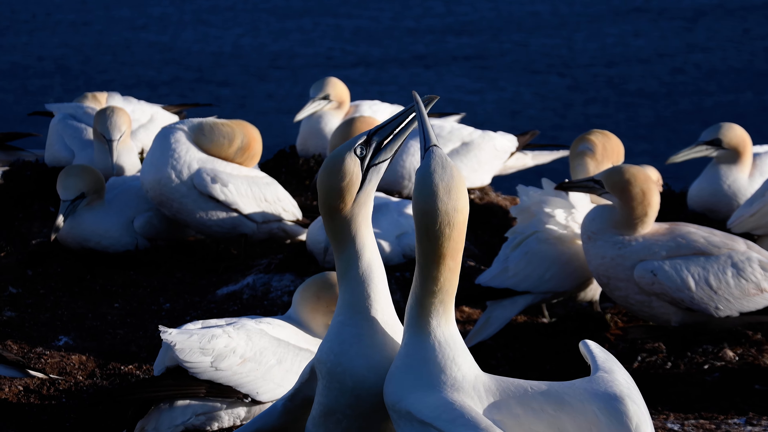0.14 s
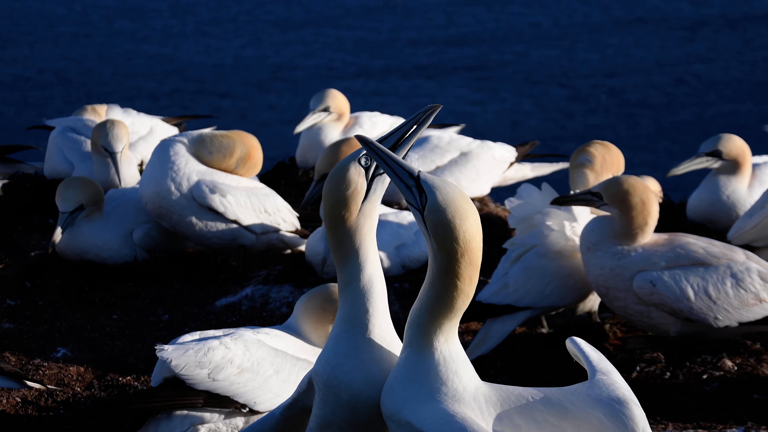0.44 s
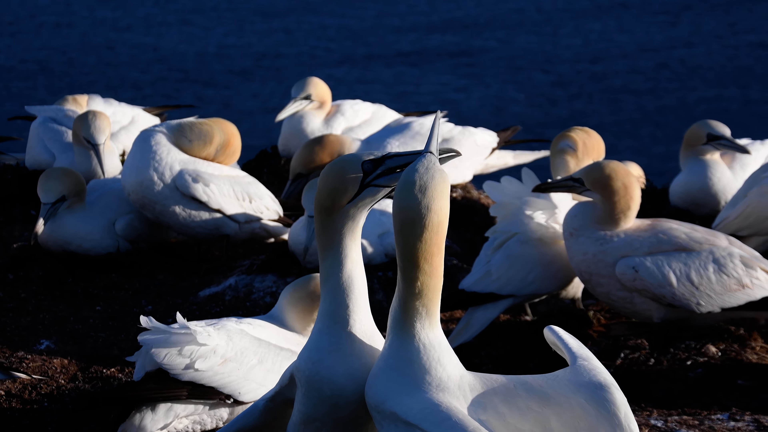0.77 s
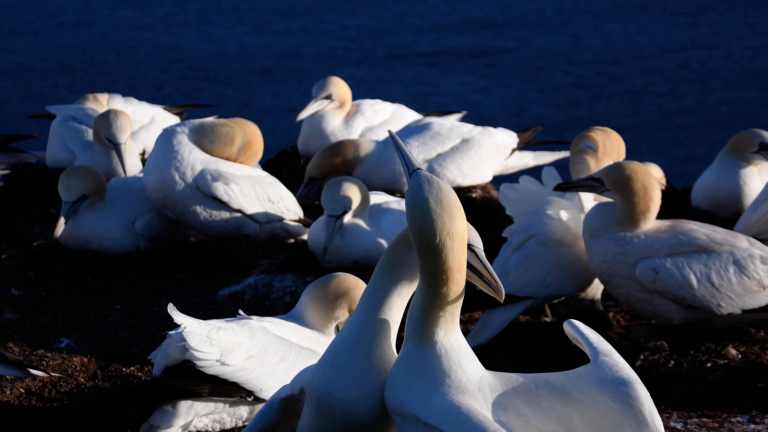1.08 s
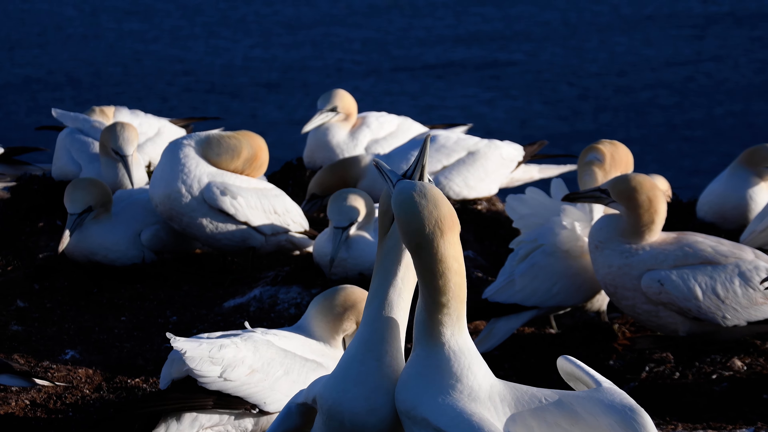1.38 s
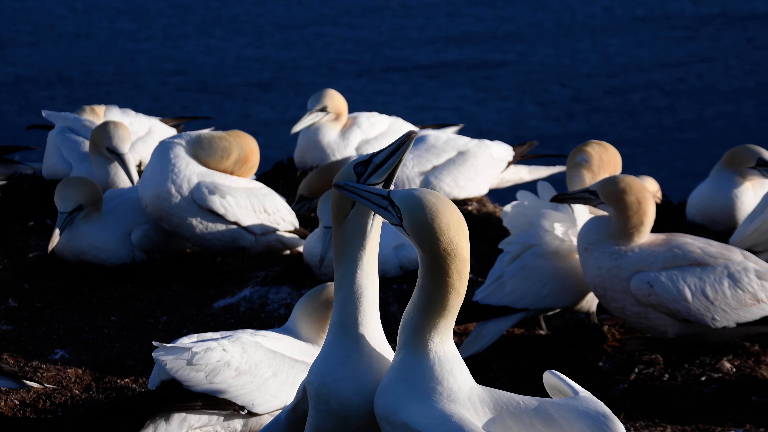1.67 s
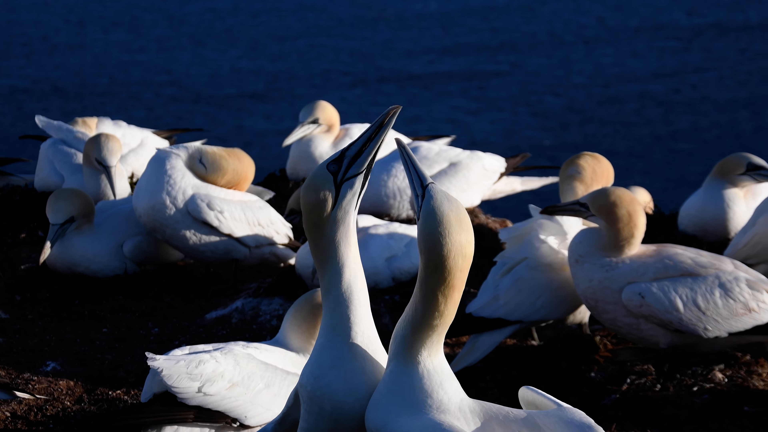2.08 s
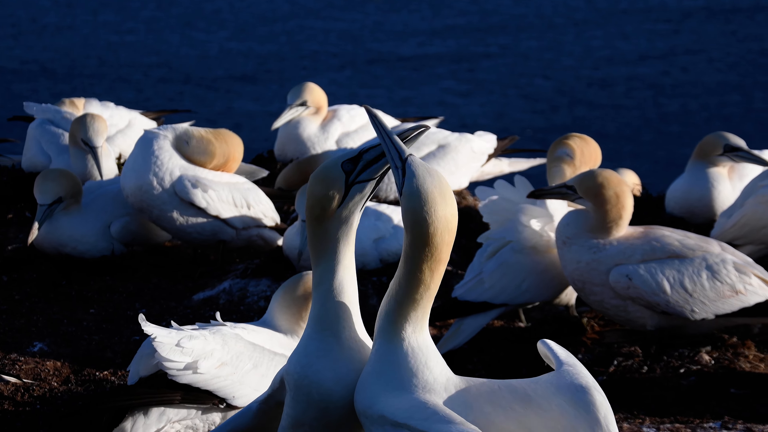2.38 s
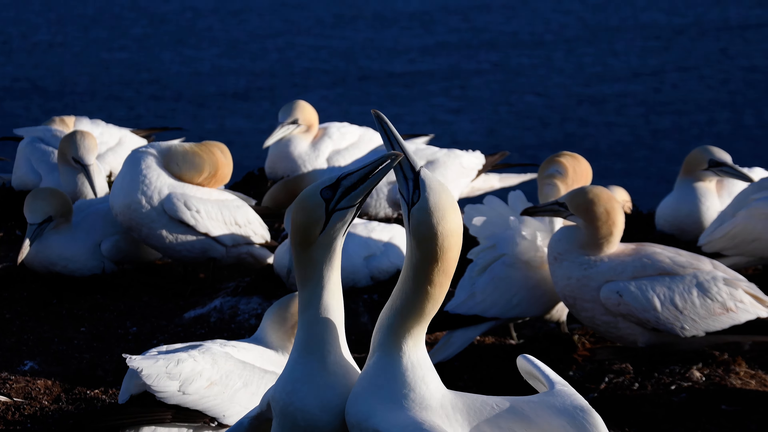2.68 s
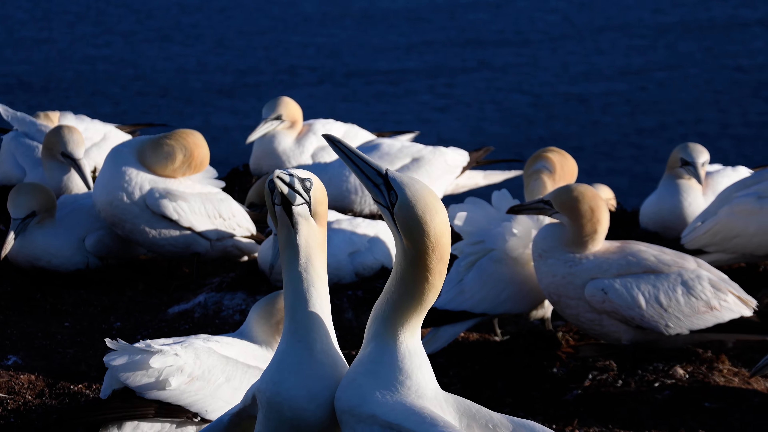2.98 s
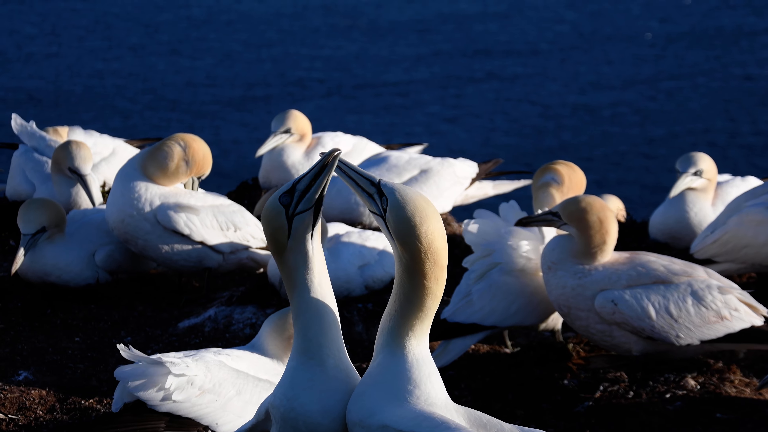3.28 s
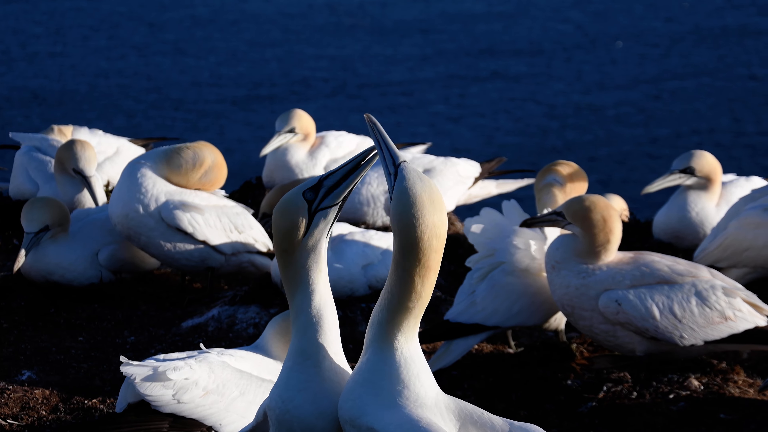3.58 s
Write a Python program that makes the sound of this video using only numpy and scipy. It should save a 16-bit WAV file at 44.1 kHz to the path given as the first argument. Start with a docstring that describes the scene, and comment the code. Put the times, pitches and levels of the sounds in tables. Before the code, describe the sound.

Gannets cackle in harsh, throbbing bursts while strong wind buffets and overloads the microphone.

```python
"""Gannets on a cliff-top colony cackle in rasping bursts, each call a run of short throbs, some clear-pitched.
Trains of air puffs and gated noise ring through throat resonances; a second, hoarser bird takes some calls.
Strong wind, made of band-passed noise, buffets the two microphone ports: it overloads the left one, with
a crackle of random dull ticks, and thumps now and then on either. Far birds blur into a faint wash over hiss."""
import sys
import numpy as np
from scipy import signal
from scipy.io import wavfile
from scipy.ndimage import uniform_filter1d

SR = 44100
rng = np.random.default_rng(int(sys.argv[2]) if len(sys.argv) > 2 else 0)


def wrap_up_sound(samples):
    """Save the sound to the file named by the first command line argument, as 16-bit audio."""
    columns = np.atleast_2d(samples).T
    # keep every value between -1 and 1, then stretch to whole-number steps
    tamed = np.clip(columns, -1, 1)
    steps = np.round(tamed * 32767).astype(np.int16)
    wavfile.write(sys.argv[1], SR, steps)


N = 164934  # length in samples

# throat and beak resonances, shared by the near gannet and the colony:
# centre_hz, width_hz, left_db, right_db (relative levels)
GANNET_THROAT = [(734, 450, -23, -14.5), (1404, 380, -5.5, -2.5), (1933, 225, -6, -0.5),
                 (2246, 140, -8.5, -9), (2740, 210, -8, -10), (3273, 190, -6, -30.5), (4150, 446, -9.5, -8),
                 (5056, 2130, -16.5, -16.5), (9700, 1600, -14, -21)]

RASP_DB = 3          # spread of the level flicker in both rough voices
OVERLOAD_KNEE = 5    # higher keeps the sound clean closer to the limit


def amp(db):
    """Turn dB into gain."""
    return 10 ** (np.asarray(db) / 20)


def rms_one(x):
    """Scale to rms 1."""
    return x / np.sqrt(np.mean(x ** 2) + 1e-20)


def in_time(rows):
    """Draw the columns of a curve table as one value per sample."""
    s, *columns = np.transpose(rows)
    return [np.interp(np.arange(N) / SR, s, c) for c in columns]


def band(x, low_hz, high_hz, order=2):
    """Butterworth band-pass."""
    return signal.sosfilt(signal.butter(order, [low_hz, high_hz], "band", fs=SR, output="sos"), x)


def drift(rate_hz):
    """Random wander of rms 1: noise through two equal one-pole low-passes."""
    r = np.exp(-2 * np.pi * rate_hz / SR)
    settle = 8000
    wander = signal.lfilter([1], [1, -2 * r, r * r], rng.standard_normal(N + settle))
    return rms_one(wander[settle:])


def squeeze(x, knee):
    """Round peaks towards 1."""
    return x / (1 + np.abs(x) ** knee) ** (1 / knee)


def gannets():
    """Throbs shape two voices: puffs of air, clear or rough, and a hoarse creak, each through its own throat."""
    # pitch of the first voice: time_s, pitch_hz
    pitch_curve = [(1.42, 594), (1.46, 638.8), (1.55, 593.5), (2.75, 597), (2.79, 643), (3.09, 622),
                   (3.14, 666.3), (3.27, 593), (3.425, 613.7), (3.45, 645.6), (3.56, 603)]
    # calls taken by the second, hoarser and brighter bird: start_s, end_s
    hoarse_calls = [(0.16, 0.34), (0.545, 0.72), (2.135, 2.305)]
    # the second bird's resonances: centre_hz, width_hz, left_db, right_db (relative levels)
    hoarse_throat = [(980, 190, -13.5, -5.5), (1590, 217, -1.5, 4.5), (2014, 157, -4, 5),
                     (2420, 118, 0.5, 2.5), (3020, 1800, -10, -27), (4660, 650, -7, -5)]
    clear_treble_cut_hz, voice_cut_hz = 3400, 4950

    clear, rough = throb_envelopes()
    pitch_hz, = in_time(pitch_curve)
    clear_tone = band(clear_voice(pitch_hz), 200, clear_treble_cut_hz)
    rasp = rasping_voice(pitch_hz)

    t = np.arange(N) / SR
    hoarse = sum((t > start) & (t < end) for start, end in hoarse_calls)
    first = (1 - hoarse) * (clear * clear_tone + rough * rasp)
    second = hoarse * np.hypot(clear, rough) * creak()

    heard = np.zeros((2, N))
    for voice, resonances in [(first, GANNET_THROAT), (second, hoarse_throat)]:
        heard += throat(band(voice + 1e-9, 200, voice_cut_hz), resonances)
    return amp(13) * heard


def throb_envelopes():
    """Each throb swells and dies; its roughness splits the power between clear tone and rasp."""
    # throbs of the calls: peak_s, rise_s, fall_s, level_db (relative), roughness (held to 0-1)
    throbs = [(0.01, 0.011, 0.028, -13.5, 1), (0.17, 0.0027, 0.016, -29, 1.2),
              (0.209, 0.024, 0.028, -19.5, 0.5), (0.254, 0.0071, 0.0087, -5.5, 0.86),
              (0.292, 0.0051, 0.017, -5.5, 0.8), (0.313, 0.0079, 0.037, -22.5, 0.9),
              (0.477, 0.027, 0.0071, -24, 1.1), (0.587, 0.043, 0.0086, -18.5, 0.25),
              (0.617, 0.0059, 0.013, -7, 0.9), (0.652, 0.011, 0.0073, -6, 1.1),
              (0.673, 0.014, 0.04, -17, 0.9), (0.737, 0.015, 0.0064, -16, 0.9),
              (0.775, 0.028, 0.03, -26.5, 1), (0.94, 0.045, 0.012, -27.5, 0.87),
              (0.965, 0.0054, 0.018, -9.5, 0.96), (1.006, 0.014, 0.056, -17, 1.1),
              (1.207, 0.028, 0.046, -27.5, 1.2), (1.25, 0.0054, 0.03, -18.5, 1.2),
              (1.293, 0.0068, 0.048, -22.5, 0.98), (1.464, 0.046, 0.025, -17, 0.22),
              (1.502, 0.021, 0.028, -16.5, 0.77), (1.528, 0.0073, 0.027, -15, 0.37),
              (1.569, 0.018, 0.03, -22, 1.1), (1.73, 0.032, 0.057, -25.5, 0.94),
              (1.768, 0.0081, 0.025, -12.5, 1.1), (1.814, 0.019, 0.011, -15.5, 0.95),
              (1.857, 0.037, 0.018, -19, 0.82), (1.902, 0.011, 0.027, -20, 1.05),
              (2.012, 0.029, 0.018, -22.5, 1.1), (2.046, 0.011, 0.021, -14.5, 1.1),
              (2.085, 0.0057, 0.016, -22, 1.1), (2.12, 0.023, 0.0088, -26, 1.1),
              (2.144, 0.0032, 0.0098, -25, 1), (2.18, 0.03, 0.02, -11.5, 1.23),
              (2.22, 0.008, 0.0071, -7.5, 1.1), (2.255, 0.03, 0.063, -20.5, 1.2),
              (2.325, 0.011, 0.011, -16, 0.86), (2.364, 0.0073, 0.009, -20.5, 1),
              (2.405, 0.031, 0.023, -24.5, 1.1), (2.572, 0.034, 0.03, -19.5, 1.1),
              (2.612, 0.013, 0.0093, -13, 0.94), (2.65, 0.0049, 0.049, -17, 1.1),
              (2.785, 0.044, 0.029, -19, 0.17), (2.818, 0.012, 0.022, -20.5, 0.84),
              (2.845, 0.008, 0.028, -14, 0.47), (2.876, 0.014, 0.066, -11, 0.96),
              (2.925, 0.014, 0.055, -14.5, 0.83), (3.131, 0.051, 0.0061, -16, 0.24),
              (3.151, 0.018, 0.038, -9.5, 0.96), (3.195, 0.01, 0.061, -13, 0.93),
              (3.254, 0.017, 0.013, -17.5, 0.54), (3.277, 0.012, 0.027, -18.5, 0.63),
              (3.359, 0.0047, 0.053, -24.5, 1.1), (3.415, 0.0075, 0.011, -17.5, 1.1),
              (3.462, 0.037, 0.023, -16, 0.22), (3.497, 0.015, 0.032, -17, 0.76),
              (3.541, 0.018, 0.029, -17.5, 0.42), (3.567, 0.0087, 0.024, -23, 0.56)]
    rise_shape, fall_shape = 0.81, 1.45  # exponents of the ramps
    snap = 0.43  # rough throbs start more abruptly

    t, clear, rough = np.arange(N) / SR, np.zeros(N), np.zeros(N)
    for peak_s, rise_s, fall_s, level_db, roughness in throbs:
        span = slice(max(int((peak_s - rise_s) * SR), 0), int((peak_s + fall_s) * SR))
        from_peak = t[span] - peak_s
        roughness = np.clip(roughness, 0, 1)
        rising = np.clip(1 + from_peak / rise_s, 0, 1) ** (rise_shape * (1 - snap * roughness))
        falling = np.clip(1 - from_peak / fall_s, 0, 1) ** fall_shape
        shape = amp(level_db) * np.where(from_peak < 0, rising, falling)
        clear[span] += shape * np.sqrt(1 - roughness)
        rough[span] += shape * np.sqrt(roughness)
    return clear, rough


def pulses(hz):
    """One narrow puff of air per cycle, local mean removed."""
    puff = np.exp(60 * (np.cos(2 * np.pi * np.cumsum(hz) / SR) - 1))
    return rms_one(puff - uniform_filter1d(puff, size=300))


def clear_voice(pitch_hz):
    """Nearly steady puffs, with a slight waver of pitch and level."""
    return pulses(pitch_hz * (1 + .006 * drift(150))) * amp(2 * drift(200))


def rasping_voice(pitch_hz):
    """Jittered puffs mixed with breath noise gated at about a third of the pitch, in a flickering level."""
    jitter = 0.11  # spread of the pitch, as a natural log
    rough_pulses = pulses(pitch_hz * np.exp(jitter * drift(90.27)))
    noise = rng.standard_normal(N)
    gate = 0.84 + np.clip(pulses(pitch_hz / 3 * np.exp(2 * jitter * drift(60))), 0, 9)
    mix = rough_pulses + 1.81 * rms_one(noise * gate)
    return rms_one(mix * amp(RASP_DB * drift(310)))


def creak():
    """Hoarse voice: slow separate pulses of uneven strength, each with a puff of breath noise."""
    creak_hz, jitter, breath, puff_decay_s = 273.7, .14, 0.73, 0.0026
    cycles = np.cumsum(creak_hz * np.exp(jitter * drift(60))) / SR
    beats = np.diff(np.floor(cycles), prepend=0)
    puffs = signal.lfilter([1], [1, -np.exp(-1 / (puff_decay_s * SR))], beats)
    mix = rms_one(beats) + breath * rms_one(puffs * rng.standard_normal(N))
    return rms_one(mix * amp(RASP_DB * drift(270)))


def resonate(x, hz, width_hz):
    """Two-pole resonance, gain 1 on top."""
    r = np.exp(-np.pi * width_hz / SR)
    return signal.lfilter([(1 - r * r) / 2, 0, (r * r - 1) / 2],
                          [1, -2 * r * np.cos(2 * np.pi * hz / SR), r * r], x)


def throat(x, resonances):
    """Parallel resonances of alternating sign, as each microphone hears them; the left one a little earlier."""
    left_leads_s = .00014
    out = np.zeros((2, N))
    for k, (hz, width_hz, left_db, right_db) in enumerate(resonances):
        out += (-1) ** k * resonate(x, hz, width_hz) * amp([[left_db], [right_db]])
    out[1] = np.interp(np.arange(N) - left_leads_s * SR, np.arange(N), out[1])
    return out


def ground(x):
    """Scattered echoes off the ground and the neighbouring birds: a decaying noise tail."""
    echo_db, echo_t60_s = -24.5, 0.15
    tail = rng.standard_normal((2, 8000)) * amp(-60 * np.arange(8000) / SR / echo_t60_s)
    tail /= np.sqrt(np.sum(tail ** 2, axis=1, keepdims=True))
    return x + amp(echo_db) * signal.fftconvolve(x, tail, axes=1)[:, :N]


def wind():
    """Lumpy turbulence, unrelated on the two ports; the capsule squeezes the swings and clips at its stops."""
    # wind on the ports: time_s, left_gust_db, right_rumble_db (relative levels)
    wind_curve = [(0, -7.5, -9), (0.3, -9, -25), (0.62, -8, -17.5), (0.9, -13.5, -23.5), (1.1, -5, -17),
                  (1.3, -13.5, -29.5), (1.41, -36, -36.5), (1.67, -33.5, -34), (1.72, -10.5, -28),
                  (2.0, -16.5, -15.5), (2.15, -16.5, -34), (2.3, -5, -19), (2.7, -11, -21), (2.92, -4, -17),
                  (3.05, -14.5, -19), (3.3, -31, -36), (3.55, -12, -30.5), (3.73, -10, -20)]
    rumble_db, rumble_follows = -7.5, 0.28  # the left rumble swings less than the flutter
    lull_lumps = 0.15  # dB of extra flicker for each dB the gust drops
    clip_drive, capsule_top = 1.17, .98

    gust_db, right_db = in_time(wind_curve)
    settle = 4000
    white, lumps = rng.standard_normal((3, N + settle)), drift(73)

    low = rms_one(band(band(white[0], 70.0, 291), 40, 413)[settle:])
    low *= amp(rumble_db + rumble_follows * gust_db + 2 * lumps)
    flutter = rms_one(band(band(white[1], 219, 763)[settle:], 100, 1283))
    flutter *= amp(gust_db + lumps + (2.5 - lull_lumps * gust_db) * drift(68))
    left = amp(-1.0) * (low + flutter)

    right = rms_one(band(band(white[2], 28, 187)[settle:], 22, 470))
    right *= amp(right_db - 3.0 + 1.1 * drift(27))
    right_flutter = rms_one(band(rng.standard_normal(N), 240, 610))
    right += right_flutter * amp(right_db - 20.5 + 9.8 * drift(27))

    push = np.array([left, right]) + thumps()
    overloaded = np.clip(clip_drive * squeeze(push, OVERLOAD_KNEE), -1, 1)
    return capsule_top * overloaded + crackle(gust_db)


def thumps():
    """Single eddies: a soft push that swings once or twice, with a pitch of its own."""
    # thumps of wind, each starting 4 ms ahead of its time: time_s, level_db (relative), port (0 left, 1 right)
    eddies = [(0.035, 10, 1), (1.076, 19, 1), (1.649, 5, 0), (1.713, -14, 0), (2.288, 15.5, 1),
              (3.082, 11, 0)]
    middle_hz, t60_s, onset_s = 197, 0.0098, 0.0057

    out, chance = np.zeros((2, N)), rng.standard_normal((len(eddies), 2))
    t = np.arange(2000) / SR
    for (time_s, level_db, port), (pitch_chance, sign_chance) in zip(eddies, chance):
        swing = np.sin(2 * np.pi * middle_hz * np.exp(0.3 * pitch_chance) * t)
        swing *= amp(-60 * t / t60_s) * np.minimum(t / onset_s, 1)
        i = max(int((time_s - .004) * SR), 0)
        out[round(port), i:i + 2000] += np.sign(sign_chance) * amp(level_db + 10.5) * swing
    return out


def crackle(gust_db):
    """Overload crackle on the left: random dull ticks of uneven size, louder with the gust."""
    ticks_per_s, level_db = 260, -31.5  # level relative to the gust
    ticks = (rng.random(N) < ticks_per_s / SR) * rng.standard_normal(N) + 1e-9
    left = amp(level_db + gust_db) * rms_one(band(ticks, 870, 2600, order=1))
    return np.array([left, np.zeros(N)])


def colony():
    """Far birds blur into a faint wavering wash: noise through the gannet throat, over a thin hiss."""
    colony_db, hiss_db = -52, -76
    far = [throat(rng.standard_normal(N) * amp(3 * drift(8)), GANNET_THROAT)[k] for k in range(2)]
    hiss = band(rng.standard_normal((2, N)), 500, 9000, order=1)
    return amp(colony_db) * rms_one(np.array(far)) + amp(hiss_db) * rms_one(hiss)


def scene():
    """Birds and far colony with two fixed narrow dips in their treble, wind on the ports."""
    # narrow dips in the treble of the birds' sound: centre_hz
    treble_dips = [7720, 9680]
    air = ground(gannets()) + colony()
    for hz in treble_dips:
        air = signal.lfilter(*signal.iirnotch(hz, 9.0, fs=SR), air)
    return air + wind()


def record(dry):
    """The input rounds and clips peaks, then a steep low-pass cuts the top."""
    stopband_hz = 16100  # 50 dB down from here up
    clipped = np.clip(1.1 * squeeze(dry, OVERLOAD_KNEE), -1, 1)
    return signal.sosfilt(signal.cheby2(12, 50, stopband_hz, fs=SR, output="sos"), clipped)


dry = scene()
out = record(dry)
wrap_up_sound(out)
```